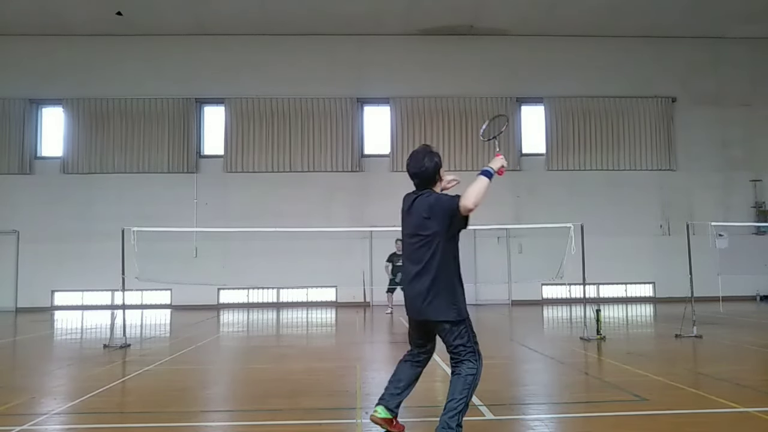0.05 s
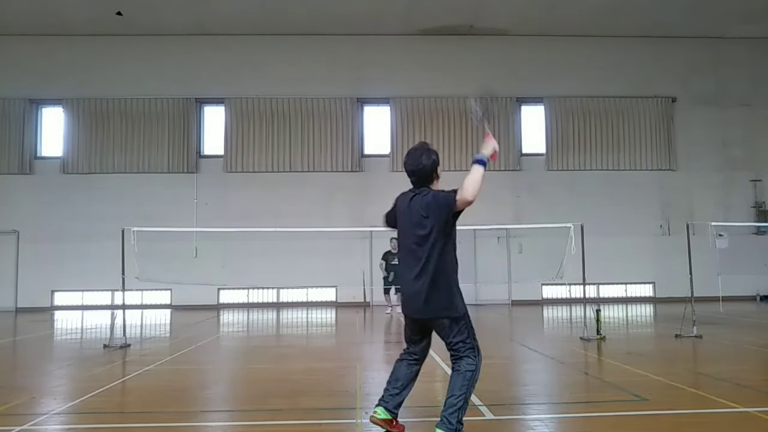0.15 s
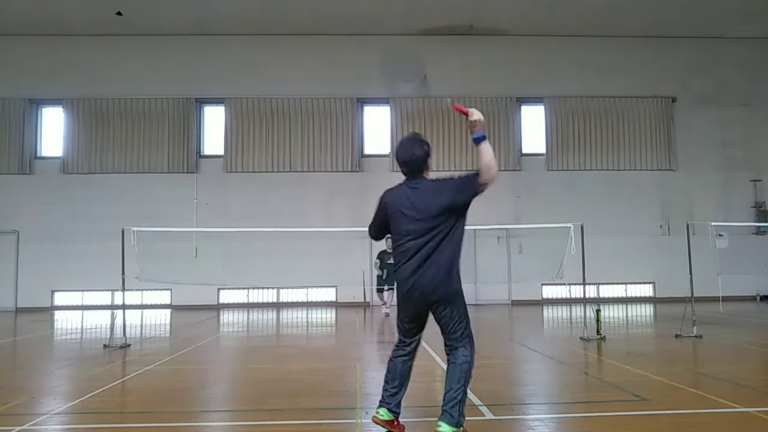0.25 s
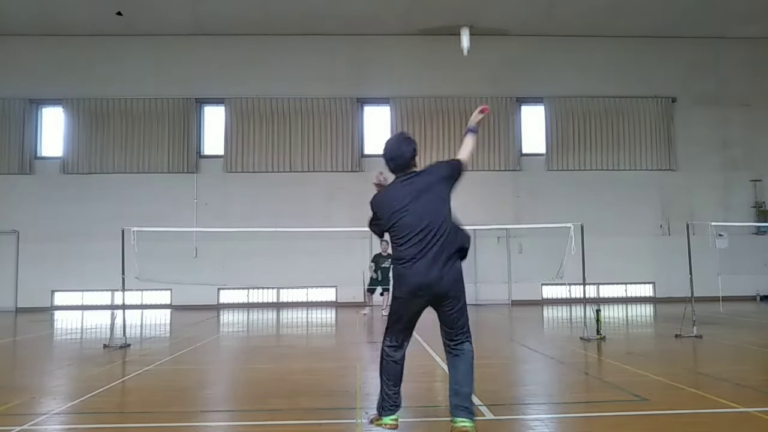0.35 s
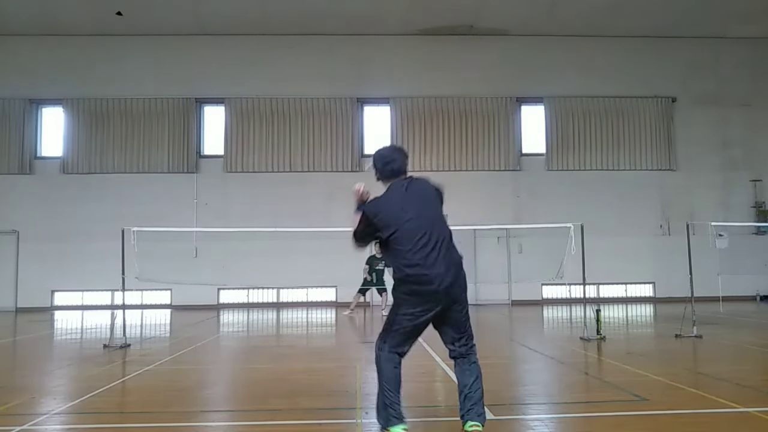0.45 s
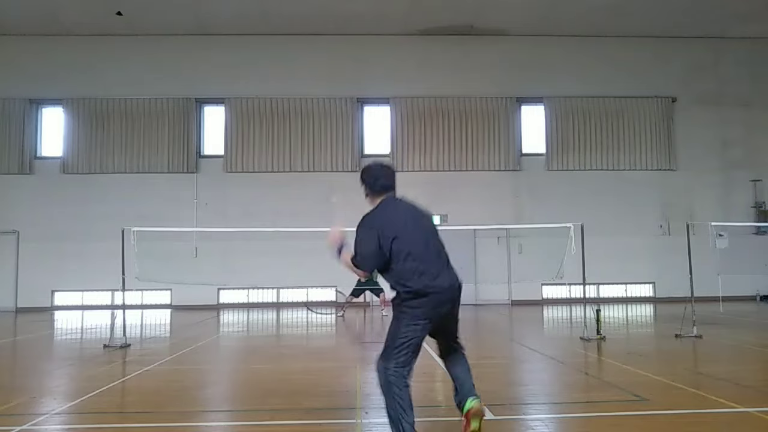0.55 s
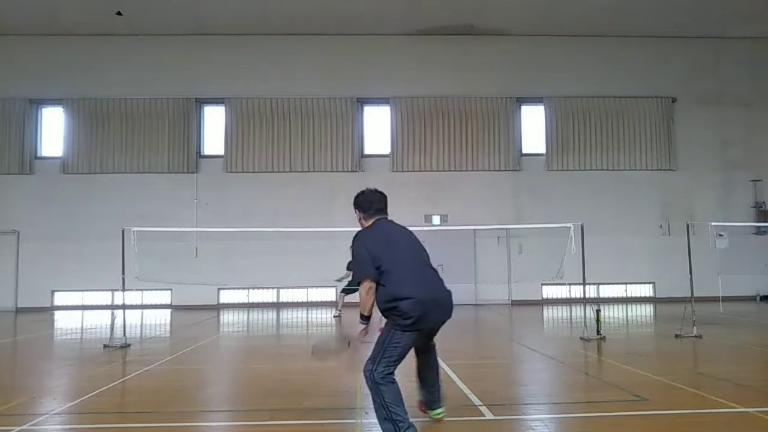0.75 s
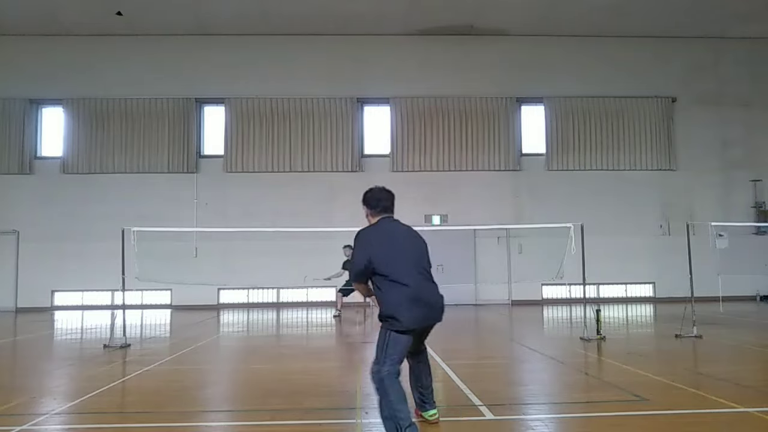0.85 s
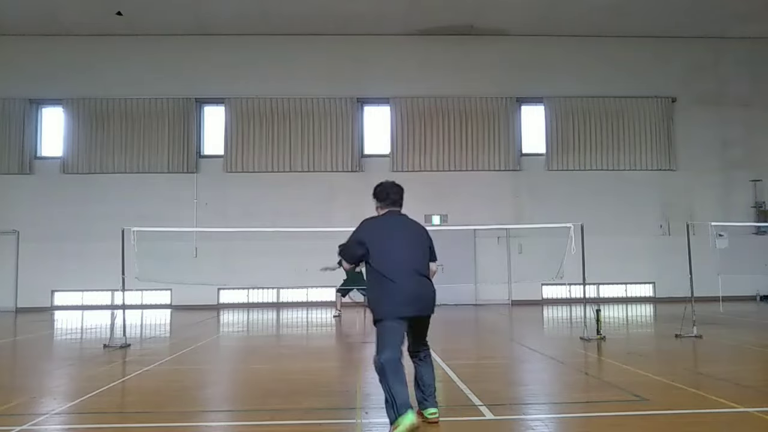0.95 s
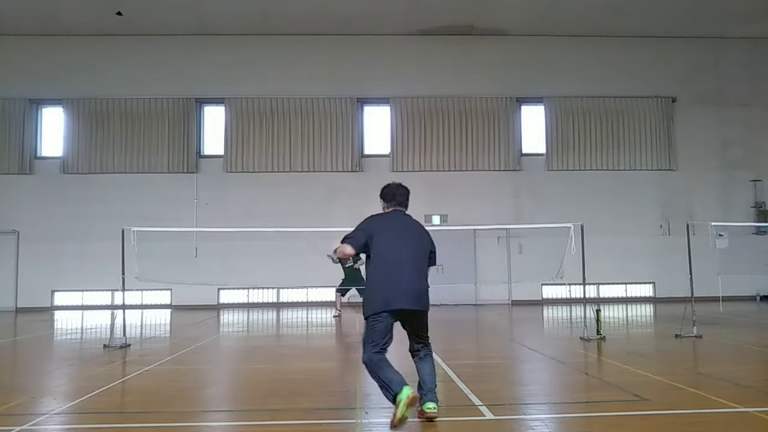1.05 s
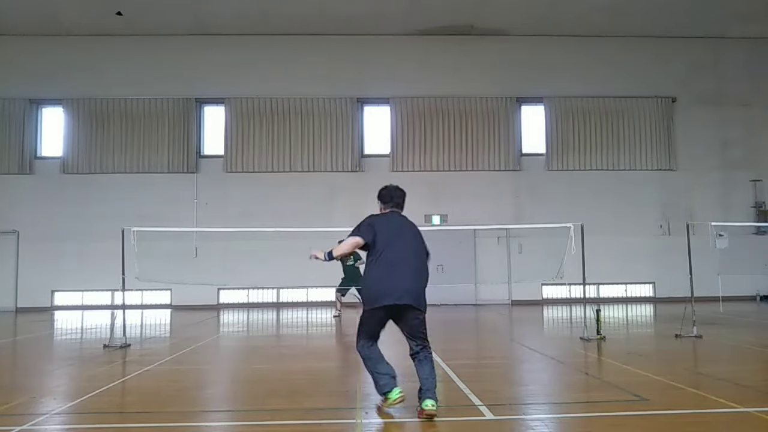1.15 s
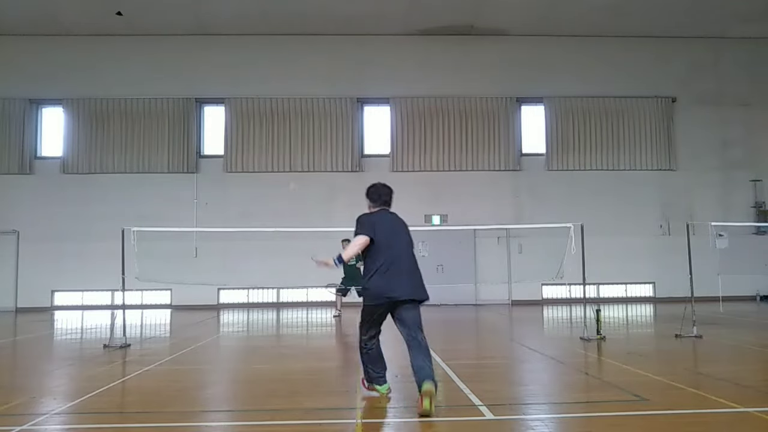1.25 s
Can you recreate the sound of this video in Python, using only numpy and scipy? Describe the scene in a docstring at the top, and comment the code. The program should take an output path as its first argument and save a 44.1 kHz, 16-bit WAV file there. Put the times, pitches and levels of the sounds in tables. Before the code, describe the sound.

A badminton racket hits a shuttlecock with a sharp, snappy crack at about 0.46 s. Before it, shoes tap and scuff around 0.1 s, clothes rustle and air swishes. Fast echoes and a hollow knock merge into a long, bright hall tail. A deep floor thud lands near 0.65 s, a firmer shoe knock at 1.07 s, with a faint distant sole squeak over low room noise.

```python
"""In a large sports hall, a badminton racket swishes and cracks against a shuttlecock a few metres away.
Shaped noise makes the swish and crack; damped modes make the ringing strings and a hollow knock.
Floor, walls and roof return separate echoes, bursts of filtered noise that merge into a long tail.
Shoes knock and scuff on the booming sprung floor, clothes rustle, and one sole squeaks far off."""
import sys
import numpy as np
from scipy import signal
from scipy.fft import rfft, irfft
from scipy.io import wavfile

SR = 44100
rng = np.random.default_rng(int(sys.argv[2]) if len(sys.argv) > 2 else 0)


def put_to_file(sound):
    """Save the sound as 16-bit audio at rate SR, in the file named by the first command-line argument."""
    columns = np.atleast_2d(sound).T  # one column per channel
    safe = np.clip(columns, -1, 1)
    whole_steps = np.round(safe * 32767)
    wavfile.write(sys.argv[1], SR, whole_steps.astype(np.int16))


N = 57330  # samples, 1.3 s

HIT_S = .4602
TAIL_LAG_S = .035  # delay of the diffuse field behind its source

# Relative spectrum of the crack and, before filtering, of its echoes: f/Hz, level/dB
CRACK_SPECTRUM = [(150, -15), (330, -10), (550, -2), (800, -4), (1150, 2), (1550, -4), (1900, 0), (2500, 0),
                  (3100, -2), (3700, -2), (4050, -6), (4300, -2), (4900, -8), (5400, -5), (6000, 0),
                  (6800, -7), (7500, -14), (8300, -34)]


def undb(db):
    """Amplitude gain is ten to the power of the level in decibels over twenty."""
    return 10 ** (np.asarray(db) / 20)


def clock(start=0):
    """Time in seconds is the sample index over the sampling rate, counted from start."""
    return np.arange(N) / SR - start


def bin_frequencies():
    """A real Fourier transform resolves N samples into these frequencies in Hz."""
    return np.fft.rfftfreq(N, 1 / SR)


def on_log_axis(points):
    """Pitch is logarithmic in frequency, so (Hz, value) points are joined on a log axis."""
    hz, value = np.array(points, float).T
    return np.interp(np.log(bin_frequencies() + 1), np.log(hz), value)


def noise(gain):
    """Linear filtering: white noise is weighted bin by bin, then scaled to unit rms."""
    spectrum = rfft(rng.standard_normal(N)) * gain
    x = irfft(spectrum, N)
    return x / x.std()


def coloured(points):
    """Spectral shaping: unit-rms noise follows a curve of (Hz, dB) points."""
    return noise(undb(on_log_axis(points)))


def burst(start, hold, t60):
    """Exponential decay: after a sudden onset and a hold, the level falls 60 dB in t60 seconds."""
    t = clock(start)
    decay = np.exp(-np.log(1000) * np.maximum(t - hold, 0) / t60)
    return (t >= 0) * decay


def ring(start, hz, t60, rise=1 / SR):
    """Damped resonance: one mode is a sinusoid that builds up quickly and decays exponentially."""
    t = np.maximum(clock(start), 0)
    build = 1 - np.exp(-t / rise)
    return np.sin(2 * np.pi * hz * t) * burst(start, 0, t60) * build


def die_away(x, start):
    """Frequency-dependent absorption: from start on, each band of x has its own reverberation time."""
    # Reverberation time of the hall: f/Hz, T60/s
    hall_t60 = [(100, 1.1), (400, 1.3), (1000, 1.9), (2500, 2.15), (4000, 2.1), (6000, 1.92), (8000, 1.5)]
    centres = [hz for hz, _ in hall_t60]
    total = np.zeros(N)
    # overlapping bands whose weights sum to one
    for weights, (_, t60) in zip(np.eye(len(hall_t60)), hall_t60):
        band = irfft(rfft(x) * on_log_axis(list(zip(centres, weights))), N)
        total = total + band * burst(start, 0, t60)
    return total


def hall(x):
    """Diffuse reverberation: x is convolved with a unit-energy impulse response of decaying noise."""
    response = die_away(rng.standard_normal(N), TAIL_LAG_S)
    return signal.fftconvolve(x, response / np.linalg.norm(response))[:N]


def room():
    """Stationary background: the hall's steady sound is noise of constant spectrum."""
    # Relative spectrum: f/Hz, level/dB
    room_spectrum = [(30, 4), (110, 11), (200, 1), (500, -7), (1100, -6), (2000, -12), (3300, -13),
                     (4500, -18), (6500, -19), (7400, -31), (8200, -49)]
    return undb(-54.3) * coloured(room_spectrum)


def sprung_floor():
    """Plate resonance: boards thud under landings and keep up a wavering boom with a rumble above it."""
    # Body weight landing on the floor: t/s, level/dB, f/Hz, T60/s
    landings = [(.076, -35, 105, .1), (.124, -23, 74, .11), (.412, -29, 88, .12), (.6, -29, 110, .1),
                (.648, -16, 90, .18), (.765, -32, 85, .12), (.905, -32, 88, .2), (.96, -34, 92, .16)]
    # Course of the boom: t/s, level/dB
    boom_level = [(0.0, -57), (0.194, -35), (0.256, -35), (0.304, -48), (0.332, -40), (0.398, -49),
                  (0.456, -28), (0.59, -35), (0.608, -41), (0.698, -28), (0.744, -41), (0.766, -36),
                  (0.864, -47), (0.976, -49), (1.016, -36), (1.162, -50), (1.186, -43), (1.3, -52)]
    # Relative spectrum of the rumble: f/Hz, level/dB
    rumble_spectrum = [(40, -20), (62, 0), (100, 0), (130, -9), (170, -19), (260, -26), (600, -38),
                       (1200, -48), (5000, -85)]
    boom_hz, waver_depth = 50, .08  # depth is the rms fraction of the frequency
    rumble_db, thud_hall_db = -10, -13  # relative to the boom, to the dry thuds

    thuds = sum(undb(db) * ring(s, hz, t60, rise=.008) for s, db, hz, t60 in landings)
    waver = noise(bin_frequencies() < 20)
    phase = 2 * np.pi * np.cumsum(boom_hz * (1 + waver_depth * waver)) / SR
    boom = np.sqrt(2) * np.sin(phase)  # unit rms
    boards = boom + undb(rumble_db) * coloured(rumble_spectrum)
    level = undb(np.interp(clock(), *np.array(boom_level).T))
    return thuds + undb(thud_hall_db) * hall(thuds) + boards * level


def shoes():
    """Impact and friction: contacts excite a hollow knock and a scuff; the first starts with a light tap."""
    # Contacts: t/s, knock level/dB, knock f/Hz, knock T60/s, scuff level/dB
    steps = [(.0685, -34, 220, .06, -50), (.087, -36, 340, .04, -48), (.1045, -34, 130, .06, -48),
             (.122, -42, 170, .05, -50), (.141, -46, 200, .03, -49), (.428, -31, 220, .04, -58),
             (.655, -27, 180, .07, -48), (.885, -42, 300, .05, -56), (1.028, -33, 330, .04, -47),
             (1.046, -28, 200, .03, -50), (1.0655, -14.5, 270, .02, -37), (1.088, -19, 235, .024, -38),
             (1.108, -29, 120, .06, -43), (1.125, -33, 380, .04, -43), (1.164, -36, 320, .05, -46)]
    # Relative spectrum of the scuffing sole: f/Hz, level/dB
    scuff_spectrum = [(200, -1), (450, 1), (650, 0), (900, 2), (1600, -4), (2300, -5), (4000, -9),
                      (6500, -11), (7600, -22), (8300, -40)]
    knock_rise_s, scuff_t60_s = .002, .045
    overtone_ratio, overtone_db = 3, -18  # relative to the knock's fundamental
    hall_db = -6  # relative to the dry steps

    sole = coloured(scuff_spectrum)
    dry = undb(-35) * ring(.0685, 2250, .011, rise=.0005)  # the tap
    for s, db, hz, t60, scuff_db in steps:
        fundamental = ring(s, hz, t60, knock_rise_s)
        overtone = undb(overtone_db) * ring(s, hz * overtone_ratio, t60 / 2, knock_rise_s)
        scuff = undb(scuff_db) * sole * burst(s, 0, scuff_t60_s)
        dry = dry + undb(db) * (fundamental + overtone) + scuff
    return dry + undb(hall_db) * hall(dry)


def rustle():
    """Friction noise: clothes and soles rustle softly as the player winds up for the stroke."""
    # Relative spectrum: f/Hz, level/dB
    rustle_spectrum = [(150, -4), (400, -2), (700, -4), (1100, 1.5), (1700, -2.5), (2600, -12), (5000, -17),
                       (6800, -22), (8200, -48)]
    start_s, rise_s, t60_s = .075, .03, 1.1
    flicker_db = 2.5  # rms swing of the level

    flicker = undb(flicker_db * noise(bin_frequencies() < 70))
    swell = np.clip(clock(start_s) / rise_s, 0, 1) * burst(start_s, 0, t60_s)
    return undb(-50.3) * swell * flicker * coloured(rustle_spectrum)


def swish():
    """Aerodynamic noise: air rushes round the racket, louder as it speeds up towards the hit."""
    # Relative spectrum: f/Hz, level/dB
    swish_spectrum = [(80, -3), (250, 0), (500, -12), (1200, -16), (3000, -24), (6500, -30), (8200, -47)]
    rise_s, fall_s = .11, .04  # time for a 30 dB change before and after the hit
    t = clock(HIT_S)
    loudness = np.exp(-np.log(1000) / 2 * np.maximum(-t / rise_s, t / fall_s))
    return undb(-33) * loudness * coloured(swish_spectrum)


def racket():
    """Impact excitation: cork, then feather skirt, crack on the strings and set their modes ringing."""
    # Modes of strings and frame: f/Hz, level/dB, T60/s
    string_modes = [(220, -19, .06), (570, -10, .035), (991, -11, .055), (1200, -4.5, .024),
                    (1900, -6, .022), (2207, -13, .08), (2530, -1, .022), (3270, -9, .035),
                    (3640, -4, .018), (4230, -2, .022), (5735, -8, .052), (6100, -9, .03)]
    crack_db, strings_db = -14, -10.8
    hold_s, t60_s = .0045, .022
    skirt_lag_s, skirt_db = .0033, -1  # the skirt lands just after the cork

    cork = burst(HIT_S, skirt_lag_s / 2, t60_s) * (clock(HIT_S) < skirt_lag_s)
    skirt = undb(skirt_db) * burst(HIT_S + skirt_lag_s, max(hold_s - skirt_lag_s, 0), t60_s)
    strings = np.zeros(N)
    for k, (hz, db, t60) in enumerate(string_modes):
        polarity = (-1) ** k
        strings = strings + polarity * undb(db) * ring(HIT_S, hz, t60, rise=.0005)
    crack = coloured(CRACK_SPECTRUM) * (cork + skirt)
    return undb(crack_db) * crack + undb(strings_db) * strings


def echoes():
    """Reflection: surfaces return the crack coloured and smeared; then the diffuse tail builds and fades."""
    # Early echoes: t/s, level/dB, centre f/Hz, half-width at half amplitude/octaves, hold/s, T60/s
    reflections = [(.470, -31, 2500, 2, .010, .06), (.4833, -19, 3700, .4, .0018, .01),
                   (.4845, -30, 220, .7, .007, .04), (.487, -27, 3500, .8, .005, .025),
                   (.496, -32, 2500, 1.1, .004, .03), (.5211, -26.5, 5500, 1.8, .002, .015),
                   (.5217, -19, 6350, .12, .0016, .01), (.529, -31, 4500, .9, .002, .02),
                   (.537, -25, 750, 1.5, .003, .025), (.549, -29, 3800, 1, .003, .02),
                   (.5622, -24, 3300, .7, .003, .014), (.569, -29, 1900, .9, .006, .03),
                   (.581, -30, 4000, 1.2, .004, .04), (.651, -29, 3000, .6, .003, .02)]
    # Relative spectrum of the tail: f/Hz, level/dB
    tail_spectrum = [(120, 1), (230, 2), (400, -1), (520, -3), (680, -.7), (900, -3), (1180, -.7),
                     (1330, -7), (1560, -2.5), (1800, -1.8), (2300, -3.5), (2850, -5), (3300, -.8),
                     (4050, -9.5), (5100, -5.5), (5550, -9), (6300, -5.8), (7000, -14), (7700, -21),
                     (8400, -44)]
    tail_db, tail_build_s = -25.3, .06

    octave = np.log2(bin_frequencies() + 1)
    crack_gain = undb(on_log_axis(CRACK_SPECTRUM))
    early = np.zeros(N)
    for s, db, hz, width, hold, t60 in reflections:
        band_gain = 1 / (1 + ((octave - np.log2(hz)) / width) ** 2)
        early = early + undb(db) * noise(crack_gain * band_gain) * burst(s, hold, t60)
    build = np.clip(clock(HIT_S + TAIL_LAG_S) / tail_build_s, 0, 1)
    tail = build * die_away(coloured(tail_spectrum), HIT_S)
    return early + undb(tail_db) * tail


def hollow_knock():
    """Modal superposition: a short hollow ring comes back with the first strong echo."""
    # Modes: f/Hz, relative level/dB, T60/s
    hollow_modes = [(715, -1, .08), (1010, -1, .06), (1555, -2, .05)]
    return undb(-20) * sum(undb(db) * ring(.4838, hz, t60, rise=.002) for hz, db, t60 in hollow_modes)


def squeak():
    """Stick-slip friction: a far rubber sole gives narrow-band partials, held briefly and then fading."""
    # Partials: f/Hz, level/dB
    partials = [(1092, -53), (1126, -51.5), (2200, -56.5), (2255, -59)]
    width_hz = 14  # from the centre to 1/e of the amplitude
    tone = np.zeros(N)
    for hz, db in partials:
        band_gain = np.exp(-((bin_frequencies() - hz) / width_hz) ** 2)
        tone = tone + undb(db) * noise(band_gain)
    return tone * burst(1.082, hold=.08, t60=.8)


def scene():
    """Superposition: the stroke, the footwork and the hall's steady background add linearly."""
    footwork = sprung_floor() + shoes() + rustle() + squeak()
    stroke = swish() + racket() + echoes() + hollow_knock()
    return (room() + footwork + stroke)[None]


def record(dry):
    """Saturation and low-pass filtering: the loudest peaks are rounded and the treble is cut."""
    ceiling, top_hz = .75, 8000
    rounded = ceiling * np.tanh(dry / ceiling)
    low_pass = signal.ellip(8, .2, 70, top_hz, fs=SR, output="sos")  # order, ripple/dB, rejection/dB
    return signal.sosfilt(low_pass, rounded)


dry = scene()
out = record(dry)
put_to_file(out)
```